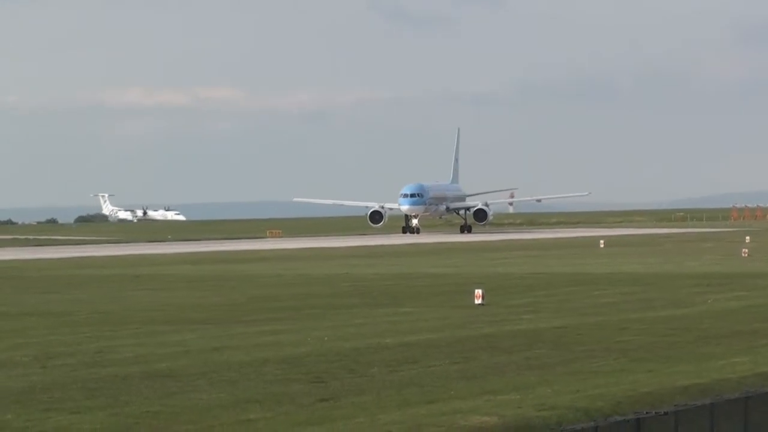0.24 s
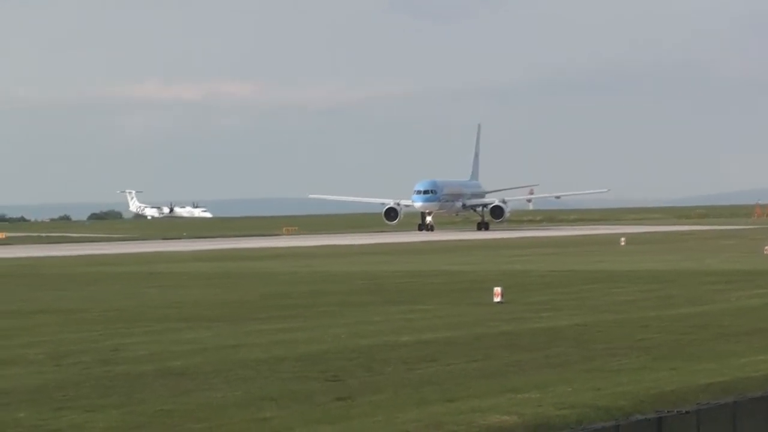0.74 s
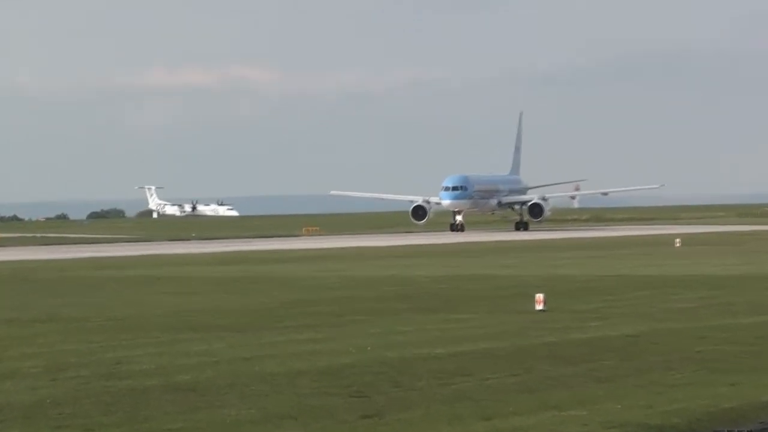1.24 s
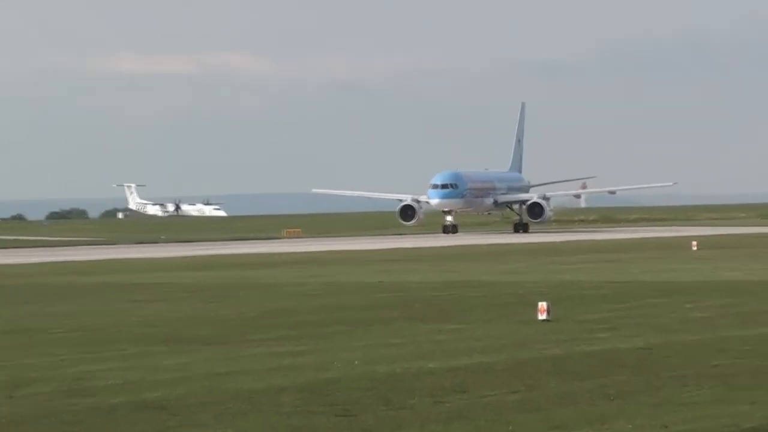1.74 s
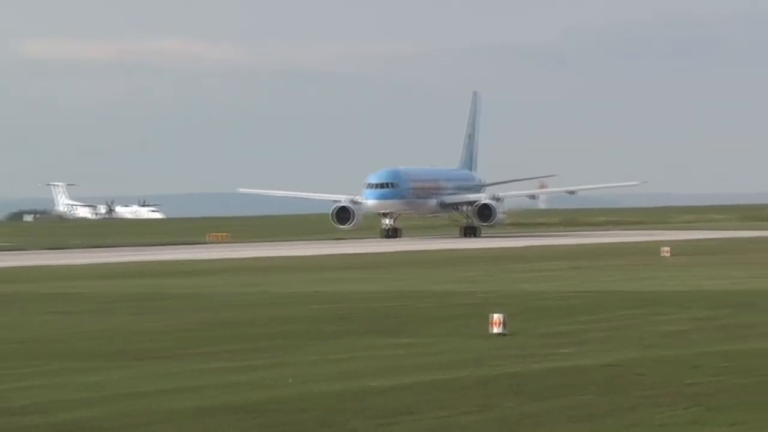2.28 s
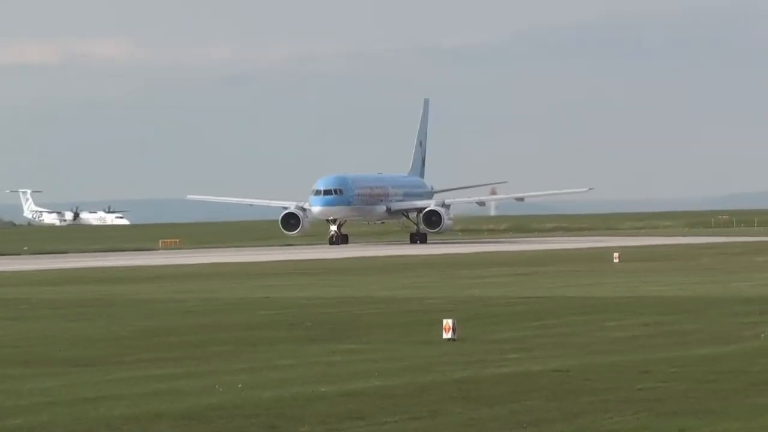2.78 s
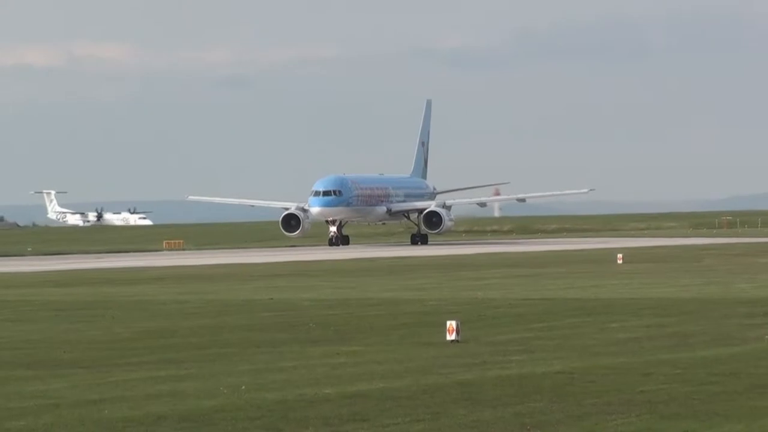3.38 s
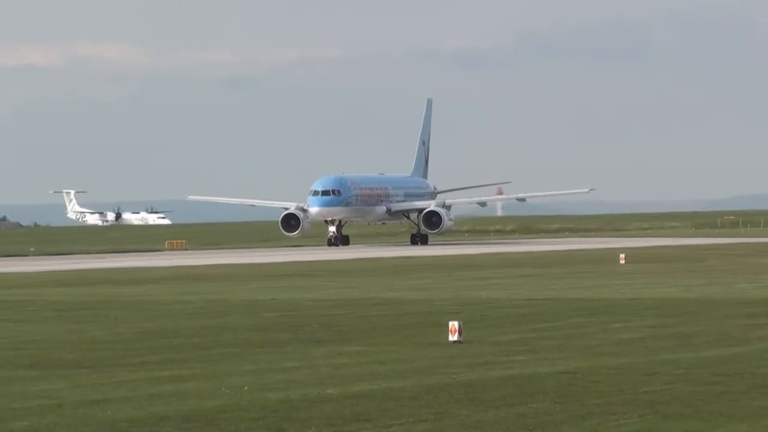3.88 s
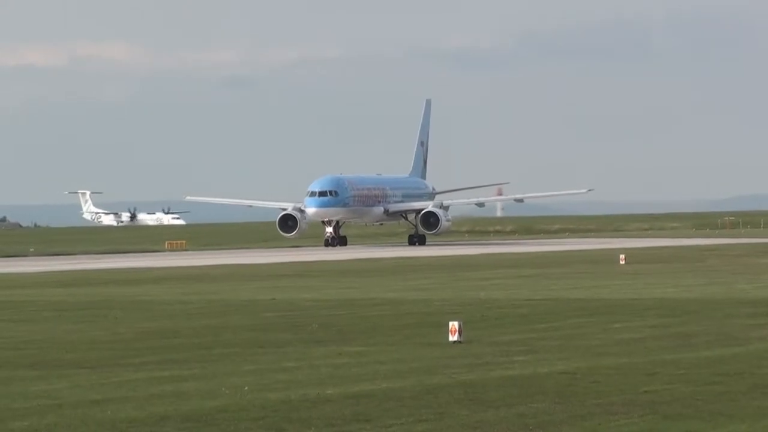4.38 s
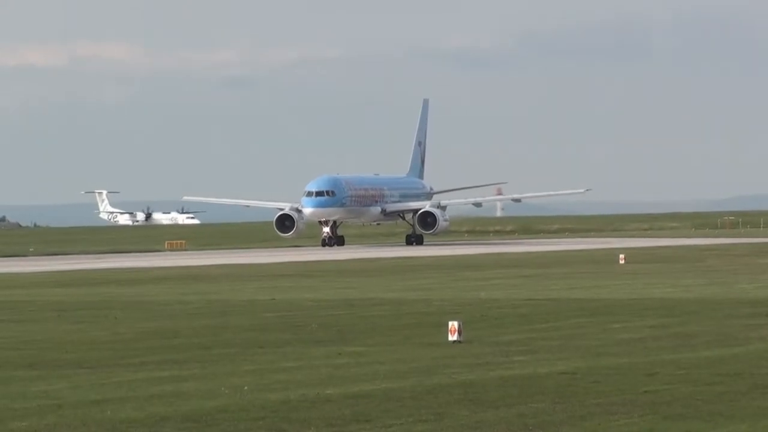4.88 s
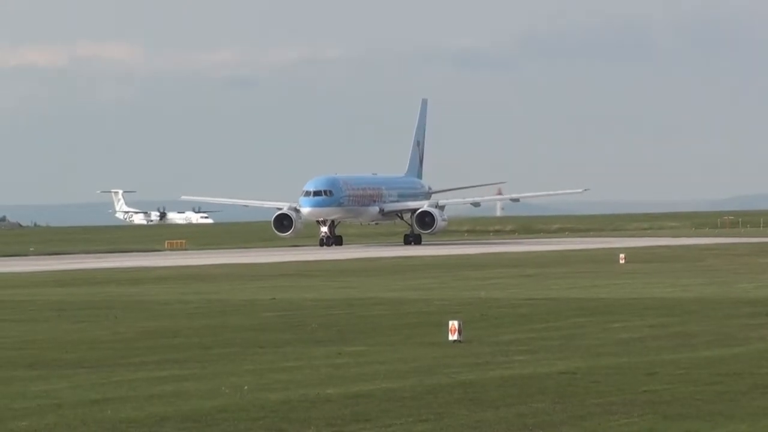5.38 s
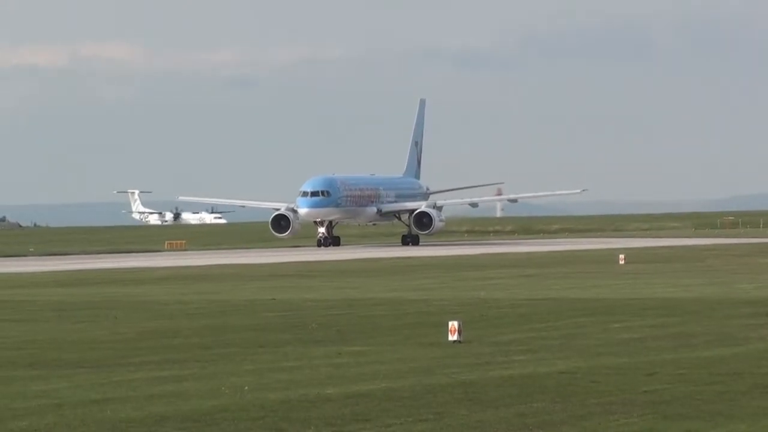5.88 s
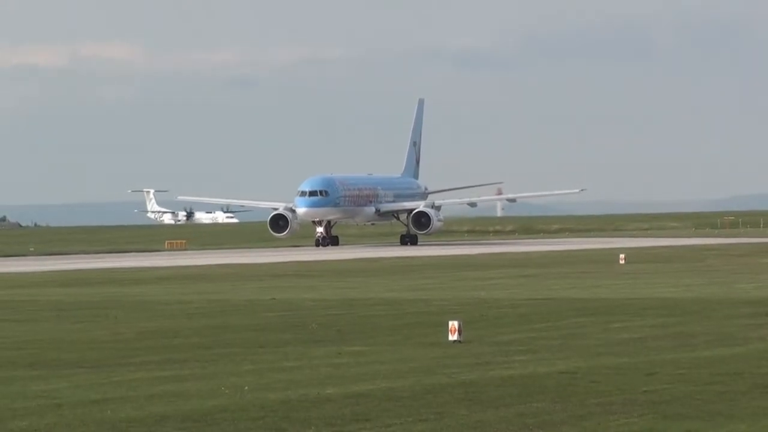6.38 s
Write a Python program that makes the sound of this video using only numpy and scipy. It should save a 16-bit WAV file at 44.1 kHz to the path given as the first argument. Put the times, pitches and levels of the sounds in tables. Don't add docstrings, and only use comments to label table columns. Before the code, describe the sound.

Low wind rumble and blustery slaps on a handheld camera microphone, with a faraway jet's steady rushing roar and shimmering high whine behind.

```python
import sys
import numpy as np
from scipy import signal
from scipy.fft import rfft, irfft, next_fast_len
from scipy.io import wavfile
from scipy.ndimage import uniform_filter1d, map_coordinates

SR = 44100
rng = np.random.default_rng(int(sys.argv[2]) if len(sys.argv) > 2 else 0)


def pcm_store(signal):
    levels = np.round(np.clip(np.atleast_2d(signal), -1, 1) * 32767)
    wavfile.write(sys.argv[1], SR, levels.astype(np.int16).T)


def boost(x):
    u = np.asarray(x, float) / 20
    return 10 ** u


N = 292868
CUT_S, CUT_DB = 4.375, 5.5


def unit(x):
    return x / np.sqrt(np.mean(x ** 2, axis=-1, keepdims=True) + 1e-20)


def along(points, hz):
    f, v = np.transpose(points)
    return np.interp(np.log(hz + 1), np.log(f + 1), v)


def curves(rows):
    s, *cols = np.transpose(rows)
    return [np.interp(np.arange(N) / SR, s, c) for c in cols]


def swells(rows):
    t = np.arange(0, N, step=64) / SR
    s, half_s, *cols = np.transpose(rows)
    bells = np.exp(-((t[:, None] - s) / half_s) ** 2)
    return [np.interp(np.arange(N) / SR, t, bells @ c) for c in cols]


def wobble(rate):
    knots = rng.standard_normal(4000)
    return map_coordinates(knots, [np.arange(N) * np.clip(rate, .1, 500) / SR])


def filtered(x, response):
    m = next_fast_len(N + SR // 2)
    return irfft(rfft(x, m) * response(np.fft.rfftfreq(m, 1 / SR)), m)[..., :N]


def coloured(x, spectrum):
    return unit(filtered(x, lambda hz: boost(along(spectrum, hz))))


def paired(x, alike):
    turn = np.arccos(np.clip(alike, -1, 1)) / 2
    shared, apart = np.cos(turn) * x[0], np.sin(turn) * x[1]
    return np.array([shared + apart, shared - apart])


def rush(spectrum, alike, patchy_db):
    z = signal.stft(rng.standard_normal((2, N)), nperseg=512)[2]
    field = uniform_filter1d(rng.standard_normal(z.shape[1:]), size=6, axis=0)
    field = uniform_filter1d(field, size=20, axis=1)
    pair = signal.istft(z * boost(patchy_db * field / field.std()), nperseg=512)[1][:, :N]
    return coloured(paired(pair, alike), spectrum)


# (time [s], level [dB])
AIR = [(0.0, -4.5), (0.11, -3), (0.27, -4.5), (0.96, -1.5), (1.13, -3.5), (1.51, 0.5), (1.83, -3.5),
       (2.16, 2), (2.62, 4.5), (2.94, 2.5), (3.29, 4.5), (3.67, -0.4), (4.3, 3), (4.54, -1.5), (5.07, -1.5),
       (5.53, -1), (6.31, 6), (6.64, 6)]


def air_clearness():
    since_cut = np.arange(N) / SR - CUT_S
    duck_db, duck_s = 2.5, 0.17
    return curves(AIR)[0] + duck_db / 2 * np.sign(-since_cut) * np.exp(-np.abs(since_cut) / duck_s)


# (time [s], half length [s], change [dB], sharpness [dB])
GUSTS = [(0.02, 0.075, 1, 3), (0.24, 0.021, -7.5, -4), (0.38, 0.046, 6, 1.5), (0.48, 0.012, -1.5, -5),
         (0.7, 0.093, 6, 5), (1.01, 0.058, 5, 4.5), (1.1, 0.006, -7.5, 2.5), (1.32, 0.05, 1.5, 0.5),
         (1.54, 0.12, 5.5, 8.5), (1.76, 0.16, -9.5, -1), (1.79, 0.03, 5.5, 2.5), (1.86, 0.01, -2.5, -5.5),
         (2.1, 0.054, -5.5, -3), (2.34, 0.066, -2, 10.5), (2.46, 0.02, -5.5, 1), (2.64, 0.14, -7.5, 4),
         (2.92, 0.07, 6.5, 6), (3.14, 0.18, -5, 1.5), (3.42, 0.06, 5.5, 4), (3.62, 0.044, -0.5, -1.5),
         (3.74, 0.042, -12.5, 3.5), (4.14, 0.016, -7.5, -0.5), (4.34, 0.061, 6.5, 2.5),
         (5.08, 0.42, -3.5, -0.7), (5.4, 0.1, -0.5, -3), (5.72, 0.16, -2.5, -0.6), (6.0, 0.1, -2.5, -1.5),
         (6.08, 0.019, 5.5, -0.5), (6.34, 0.24, 3, 1), (6.64, 0.026, -6.5, 1)]


def gusts():
    return swells(GUSTS)


# (frequency [Hz], density [dB per Hz])
EXHAUST = [(100, -120), (300, -40), (600, -6.5), (1000, -0.7), (1500, -0.9), (2000, 0.8), (2600, -3),
           (3050, -5), (3500, -38), (4500, -120)]
# (frequency [Hz], density [dB per Hz])
INTAKE = [(1800, -120), (2700, -36), (3050, -14), (3300, -1.5), (3800, -5), (4050, -2.5), (4300, -9),
          (4800, -36), (6000, -120)]
# (frequency [Hz], density [dB per Hz])
EDGE = [(2500, -120), (4000, -25), (4500, 1), (5200, -6), (6000, -12), (7000, -26), (8500, -24),
        (10000, -47), (13000, -120)]


def roar(air_db):
    turn_db = 0.85 * (np.arange(N) - N / 2) / SR
    exhaust_db = -49 + 0.97 * air_db - turn_db + 0.13 * gusts()[0]
    out = boost(exhaust_db) * rush(EXHAUST, alike=0.94, patchy_db=1.58)
    out += boost(-55 + 0.65 * air_db) * rush(INTAKE, alike=0.77, patchy_db=2.0)
    out += boost(-64.5 + 0.78 * air_db) * rush(EDGE, alike=0.92, patchy_db=3.0)
    return out


def whine(hz, level_db, wander_hz, flutter):
    phase = 2 * np.pi * np.cumsum(hz + wander_hz * wobble(30)) / SR
    apart = 0.3 * wobble(5) * np.array([[1], [-1]])
    paths = (1 + flutter * wobble(45)) / np.hypot(1, flutter)
    return np.sqrt(2) * boost(level_db) * paths * np.sin(phase + apart)


# (time [s], half length [s], change [dB])
THIRD_GLINTS = [
    [(0.62, 0.12, 4), (1.14, 0.14, 13), (2.08, 0.08, 12), (2.5, 0.41, 13), (3.15, .15, 10),
     (3.94, 0.05, 15), (4.3, 0.05, -2), (4.56, 0.08, 6), (5.24, 0.05, 13), (5.6, 0.15, 11)],
    [(2.52, 0.08, 10.8), (3.3, 0.05, 13), (3.62, 0.05, 13), (3.78, 0.17, 20), (3.9, 0.05, 11),
     (4.3, 0.05, 8), (5.18, 0.059, 13), (5.74, 0.2, 8), (6.32, 0.46, 14)],
    [(0.15, 0.08, 14), (0.29, 0.07, 17), (0.6, .05, 5), (0.84, 0.064, 7.5), (1.14, 0.072, 15.5),
     (1.6, 0.16, 2), (2.2, .15, 7), (3.1, 0.042, -1), (3.26, 0.06, 6), (3.6, 0.048, 7), (3.92, 0.05, 1),
     (5.32, 0.043, 9), (5.85, 0.1, 5), (6.24, .05, 10), (6.45, .08, 6), (6.63, .04, 13)],
]


def carried(levels_db, glints, third, air_db):
    rows_of_tones = [*glints, THIRD_GLINTS[third]]
    return [db + air_db + swells(rows)[0] + 1.1 * wobble(9) for db, rows in zip(levels_db, rows_of_tones)]


FAN_HZ = [1834.5, 3671.5, 1985]
FAN_DB = [-65.5, -77, -70.5]
# (time [s], half length [s], change [dB])
FAN_GLINTS = [
    [(0.42, 0.14, -1), (0.76, 0.037, 11), (1.3, 0.19, 10.5), (1.75, 0.15, 8), (2.24, 0.051, 14),
     (2.3, 0.056, 3.5), (2.56, 0.14, 7.5), (2.95, 0.099, 5), (2.82, 0.057, 6), (3.2, 0.3, 5),
     (3.64, 0.049, -14), (3.88, 0.047, 5.5), (3.96, 0.33, 9), (4.52, 0.057, 8), (5.38, 0.2, 10.5),
     (5.05, 0.13, 6), (5.5, 0.035, 8), (5.7, 0.099, -13), (6.56, 0.35, 5)],
    [(0.04, 0.04, 14), (0.46, 0.35, 11.5), (0.66, 0.04, 7), (1.0, 0.22, -18), (1.3, 0.054, 7),
     (1.48, 0.97, 23.5), (1.68, 0.065, -23), (2.16, 0.081, -1), (2.4, 0.046, 5.5), (2.86, 0.51, 21.5),
     (3.2, 0.1, 8.5), (3.82, 0.49, 15.5), (5.58, 0.18, -1), (6.16, 0.28, 15)],
]
# (frequency [Hz], density [dB per Hz])
HALO = [(3000, -78), (3500, -9), (3750, 4.5), (4000, -7.5), (4500, -80)]


def fan(air_db):
    fan_db = carried(FAN_DB, FAN_GLINTS, 0, air_db)
    tones = sum(whine(hz, db + .5, wander_hz=5, flutter=.15) for hz, db in zip(FAN_HZ, fan_db))
    return tones + boost(fan_db[1] - 6.0) * rush(HALO, alike=.9, patchy_db=5.0)


# (time [s], frequency [Hz])
SPOOL = [
    (0, 4535),
    (1.5, 4529),
    (3, 4521),
    (6.64, 4515),
]


def shaft_speed():
    return curves(SPOOL)[0] / CORE_HZ[1]


CORE_HZ = [4180, 4520, 5279]
CORE_DB = [-64.5, -70, -86.5]
# (time [s], half length [s], change [dB])
CORE_GLINTS = [
    [(0.18, 0.22, -11), (.6, 0.064, 7), (1.3, 0.11, -14), (1.74, 0.04, 10), (2.08, 0.046, -12),
     (2.22, 0.19, 12.5), (3.12, 0.64, 8.5), (4.02, 0.04, 4.5), (4.32, 0.7, 8), (4.36, 0.087, -6),
     (5.08, 0.065, 11.5), (5.54, 0.045, -9), (5.7, 0.25, 10.5), (5.72, 0.04, 6), (6.22, 0.1, 9),
     (6.54, 0.22, 6)],
    [(1.98, 0.083, 11), (2.48, 0.04, 6), (3.46, 0.24, 11), (3.62, 0.13, -13), (3.86, 0.035, 8),
     (4.42, 0.072, 5), (4.7, 0.04, 6.8), (4.8, 0.41, 8), (5.12, 0.073, 6), (5.36, 0.032, 10),
     (5.54, 0.028, 8), (5.82, 0.05, 4), (6.26, 0.07, -23), (6.34, 0.71, 16)],
]


def compressor(air_db):
    low_hz, high_hz, top_hz = [hz * shaft_speed() for hz in CORE_HZ]
    second_hz = (CORE_HZ[0] + 21) * shaft_speed()
    low_db, high_db, top_db = carried(CORE_DB, CORE_GLINTS, 1, air_db)
    tones = whine(low_hz, low_db - 2.5, wander_hz=7, flutter=.3)
    tones += whine(second_hz, low_db - 4.5, wander_hz=9, flutter=.4)
    tones += whine(high_hz, high_db + .4, wander_hz=4, flutter=.2)
    tones += whine(top_hz, top_db - 1, wander_hz=7, flutter=0.4)
    return tones


STAGE_HZ = [3838, 3890, 3968]
STAGE_DB = [-74, -74, -70]
# (time [s], half length [s], change [dB])
STAGE_GLINTS = [
    [(1.5, 0.35, 7.0), (2.34, 0.5, 9.3), (3.88, 0.5, 12.7), (4.56, 0.09, 11.8), (5.66, 0.5, 11.8),
     (6.6, 0.35, 7.3)],
    [(1.7, 0.5, 11.0), (2.72, 0.5, 11.9), (3.14, 0.09, 9.0), (4.24, 0.5, 6.2), (5.16, 0.14, 7.2),
     (5.76, 0.5, 9.5)],
]


def middle_stages(air_db):
    speed, stage_db = shaft_speed(), carried(STAGE_DB, STAGE_GLINTS, 2, air_db)
    return sum(whine(hz * speed, db, wander_hz=8, flutter=0.5) for hz, db in zip(STAGE_HZ, stage_db))


MINOR_HZ = [2071, 2094, 2266, 3603, 3709, 4150, 4342, 5453, 5690, 6010]
MINOR = [-69, -66, -70, -72, -66, -72, -70, -85, -91, -89]


def minor_tones(air_db):
    swell_db = air_db - air_db.mean()
    levels_db = [db + swell_db + 3 * wobble(2.5) for db in MINOR]
    return sum(whine(hz, db, wander_hz=4, flutter=.6) for hz, db in zip(MINOR_HZ, levels_db))


# (frequency [Hz], density [dB per Hz])
DRONE = [(700, -80.5), (980, -3), (1100, 1), (1220, -11.5), (1600, -82)]
# (time [s], half length [s], change [dB])
DRONE_SWELLS = [
    (2.25, 0.087, 10),
    (3.3, .06, 10),
    (3.73, 0.071, 12.4),
    (3.9, 0.074, 9.9),
    (4.05, 0.12, 13),
    (4.2, 0.086, 15),
]


def drone():
    return boost(-64.5 + swells(DRONE_SWELLS)[0]) * rush(DRONE, alike=.8, patchy_db=2.8)


# (time from start [s], frequency [Hz], level [dB])
SWEEP = [
    (0, 3730, -68.5),
    (0.129, 3700, -51.5),
    (.28, 3370, -48),
    (.4, 3335, -48.5),
    (.53, 3120, -85),
]
# (start [s], length share [1], glide share [1], lift [dB])
SWEEPS = [
    (2.04, 0.5, 0.8, -0.5),
    (3.019, 1.01, 1.01, -2.5),
    (6.082, 0.82, 0.8, -4),
]


def sweep():
    band = unit(filtered(rng.standard_normal((2, N)), lambda f: 1 / (1 + (f / 260) ** 4)))
    out, t = np.zeros(N), np.arange(N) / SR
    start_hz = SWEEP[0][1]
    for s, share, glide, lift_db in SWEEPS:
        rows = [(s + share * after, start_hz * (1 - glide) + hz * glide, db) for after, hz, db in SWEEP]
        hz, db = curves(rows)
        phase = 2 * np.pi * np.cumsum(hz) / SR
        heard = (t > rows[0][0]) & (t < rows[-1][0])
        out += heard * boost(db + lift_db) * (band[0] * np.cos(phase) + band[1] * np.sin(phase))
    return out


def engines():
    air_db = air_clearness()
    tones = fan(air_db) + compressor(air_db) + middle_stages(air_db) + minor_tones(air_db)
    return roar(air_db) + tones + drone() + sweep()


# (frequency [Hz], density [dB per Hz])
BUFFET = [(5, -95.5), (15, -36.5), (25, -15.5), (50, -10), (95, -4), (150, -4.5), (230, -13), (400, -38.5),
          (700, -62), (1200, -120)]
# (time [s], half length [s], change [dB])
HEAVES = [(0.11, 0.061, -2), (0.419, 0.025, 2.5), (0.504, 0.014, -8), (0.599, 0.025, 6.5),
          (0.733, 0.064, -1), (1.043, 0.086, -3), (1.207, 0.031, 0), (1.497, 0.022, -1),
          (1.601, 0.022, -2.5), (1.651, 0.017, 7), (1.866, 0.02, 0.5), (1.951, 0.023, 6),
          (2.04, 0.025, -6.5), (2.185, 0.025, -6.5), (2.355, 0.04, 4.0), (2.484, 0.025, -4),
          (2.679, 0.036, -6.5), (3.128, 0.027, 5.5), (3.168, 0.023, -3), (3.377, 0.07, 2.5),
          (3.602, 0.025, -3), (3.831, 0.017, -3), (3.971, 0.0091, 5.5), (4.076, 0.025, 7.5),
          (4.146, 0.04, -3.5), (4.146, 0.061, 2), (4.235, 0.025, 3.5), (4.46, 0.018, 2), (4.535, 0.033, -3),
          (4.605, 0.016, 4), (4.814, 0.029, -5.5), (4.889, 0.025, 4), (4.949, 0.033, -6.5),
          (5.029, 0.023, 3), (5.098, 0.018, -2.5), (5.273, 0.017, 4.5), (5.363, 0.025, 0.5),
          (5.473, 0.022, -2.5), (5.637, 0.027, -1.5), (5.837, 0.019, 5.5), (6.106, 0.025, -4.0),
          (6.171, 0.12, 0.5), (6.43, 0.025, -2.5), (6.565, 0.07, 1)]


def buffet(gust_db, sharp_db, lumps_db):
    level_db = -24.5 + 1.1 * gust_db - sharp_db / 2 + lumps_db + swells(HEAVES)[0]
    return boost(level_db) * rush(BUFFET, alike=0.78, patchy_db=0.6)


def eddies(rate, spread_db, push, smooth):
    draw = rng.random((3, N))
    size = -np.log(draw[1] + .06)
    strikes = (draw[0] < rate / SR) * boost(spread_db * size) * np.where(draw[2] < push, 1, -1)
    return unit(strikes) + smooth * rng.standard_normal(N)


# (frequency [Hz], density [dB per Hz])
EDDY = [(20, -100), (60, -54.5), (130, -10.5), (220, -3.5), (330, -5.5), (520, -12), (800, -20),
        (1300, -26), (2500, -39), (5000, -76), (9000, -120)]


def quick_eddies(gust_db, sharp_db, lumps_db):
    left = eddies(rate=260, spread_db=3, push=.8, smooth=1.1)
    right = eddies(rate=300, spread_db=5.2, push=0.6, smooth=1.1)
    pair = np.array([left, right + 0.54 * np.roll(left, 6)])
    level_db = -33 + 0.71 * gust_db + sharp_db / 2 + lumps_db + 1.57 * wobble(45)
    return boost(level_db) * coloured(pair, EDDY)


def struck(events, spectrum, ragged_s=0):
    blows, t = np.zeros((2, N + 256)), np.arange(256) / SR
    for (s, left_db, right_db), tear in zip(events, rng.standard_normal((len(events), 256))):
        shape = tear * np.exp(-t / ragged_s) if ragged_s else 1. * (t == 0)
        shape = shape / np.linalg.norm(shape)
        blows[:, round(s * SR):][:, :256] += np.outer(boost([left_db, right_db]), shape)
    colour = lambda hz: boost(along(spectrum, hz))
    return filtered(blows[:, :N], colour) / colour(np.linspace(0, SR / 2, num=4096)).mean()


# (time [s], peak [dB])
SLAPS = [(0.0187, -18.5), (0.1791, -16.5), (0.2988, -4), (0.329, -12), (0.379, -11), (0.3968, -15),
         (0.4026, -4), (0.5469, -9.5), (0.6844, -6), (0.6986, -13), (0.7567, -9), (0.7752, -9),
         (0.8367, -6), (0.8464, -9.5), (1.0109, -9.5), (1.032, -11.5), (1.0671, -11.5), (1.1457, -9.5),
         (1.1604, -8), (1.1993, -4.5), (1.2398, -8.5), (1.3143, -2.5), (1.3297, -5.5), (1.4583, -6.5),
         (1.5146, -2.5), (1.5407, -21.5), (1.563, -13), (1.576, -6.5), (1.9229, -8), (2.2413, -9),
         (2.9147, -19), (2.9372, -21), (3.3282, -11.5), (3.3695, -5), (3.4006, -11), (3.4195, -8),
         (3.4458, -16.5), (3.4635, -6), (3.6795, -16), (3.8585, -6), (3.9721, -7.5), (4.0372, -8.5),
         (4.292, -8.5), (4.3383, -9.5), (4.3442, -4.5), (4.3868, -4.5), (4.3968, -14.5), (4.6681, -9.5),
         (4.7045, -14.5), (4.7662, -10.5), (4.8893, -12.5), (5.2857, -8), (5.8367, -9.5), (5.8463, -10.5),
         (6.0635, -15), (6.0727, -10.0), (6.192, -9), (6.2751, -3.5), (6.2957, -8.5), (6.3543, -8.5)]
# (time [s], peak [dB])
PATS = [(0.078, -21.5), (0.1197, -11.5), (0.1324, -17), (0.1881, -14), (0.2046, -9), (0.3535, -13),
        (0.3629, -15), (0.3712, -18.5), (0.3865, -7.5), (0.5191, -6), (0.5576, -11), (0.5704, -9),
        (0.6014, -12.5), (0.7142, -15), (0.7906, -15), (0.9376, -4.5), (0.9478, -13), (0.9524, -14.5),
        (1.0255, -17), (1.1803, -23.5), (1.3061, -19), (1.4374, -15), (1.473, -15.5), (1.4812, -19),
        (1.5187, -11), (1.5458, -11), (1.5675, -20.5), (1.8067, -11.5), (1.897, -11.5), (1.9524, -18.5),
        (1.9629, -16), (1.9767, -13.0), (2.5245, -12), (2.8819, -14.0), (2.9684, -9.5), (2.9749, -14.5),
        (2.9788, -8), (3.3908, -18), (3.4079, -11), (3.4897, -17), (3.5513, -15), (3.8781, -14.5),
        (4.0732, -11), (4.322, -11), (4.373, -20), (4.3795, -22), (4.4689, -20), (4.5193, -9),
        (4.7447, -12.5), (5.827, -11), (5.9066, -9.5), (6.0864, -21.5), (6.1403, -14), (6.3653, -10.5),
        (6.4712, -11), (6.4854, -17), (6.4934, -9.5), (6.546, -9), (6.5632, -19.5), (6.5745, -18.5)]
# (time [s], peak [dB])
SUCKS = [(0.0171, -7), (0.3682, -13), (0.3776, -16.5), (0.3985, -14.5), (0.753, -6.5), (1.0234, -9.5),
         (1.0303, -17), (1.4424, -6), (1.542, -18), (1.568, -6), (1.5776, -9), (2.8673, -11),
         (4.0339, -12.5), (4.3202, -10.0), (4.3405, -14), (4.3911, -9), (5.5858, -9.5), (6.062, -7),
         (6.3422, -18), (6.3555, -8.5)]
# (frequency [Hz], density [dB per Hz])
SLAP = [(30, -30.5), (90, 0), (200, 0), (400, -6), (700, -16), (1200, -34), (2200, -52.5), (6000, -120)]


def slaps():
    both = lambda rows: struck([(s, db - 3.5, db - 10) for s, db in rows], SLAP)
    blows = both(SLAPS + PATS) - both(SUCKS)
    return filtered(blows, lambda hz: np.exp(-.5j * port_lead(hz)))


# (time [s], peak [dB], left-right [dB])
SNAPS = [(0.0211, -38, 12), (0.0498, -33, 11), (0.1739, -31, 13), (0.2049, -47, 5.0), (0.2858, -45, 3.0),
         (0.2982, -32, 7), (0.3952, -30, 7), (0.5731, -36, 7), (0.6011, -36, 4.0), (0.698, -34.5, 4),
         (0.8193, -35, 8), (0.8374, -35.5, 8), (0.9314, -32.5, 12), (1.0262, -35, -3),
         (1.1598, -37.5, -1.0), (1.1969, -38, 6), (1.2278, -39, -1.0), (1.2394, -33.5, 1), (1.2517, -31, 2),
         (1.314, -28, 8), (1.5112, -34, 5), (1.8226, -46, -3), (2.3887, -35.0, 2), (2.9806, -28, 7),
         (3.3286, -34, -9), (3.4633, -40, 3), (4.2121, -36, -3), (4.292, -27.5, 2.0), (4.5064, -36, 2),
         (4.7068, -39, -3), (4.7659, -39, 11), (5.1362, -32, -0.5), (5.2148, -39.0, -6), (5.8272, -38, 0.5),
         (6.1439, -38, -1.0), (6.2968, -39, 14), (6.3631, -34.0, 8), (6.6283, -37.0, -7.0),
         (6.6376, -39.5, 0.0)]
# (frequency [Hz], density [dB per Hz])
SNAP = [(400, -87.5), (900, -11.5), (1600, -10), (3000, -14.5), (4200, -43.5), (6000, -120)]


def snaps():
    events = [(s, db + pan_db / 2 + 5, db - pan_db / 2 + 2) for s, db, pan_db in SNAPS]
    return struck(events, SNAP, ragged_s=.0025)


def wind():
    gust_db, sharp_db = gusts()
    lumps_db = 0.92 * wobble(25)
    steady = buffet(gust_db, sharp_db, lumps_db) + quick_eddies(gust_db, sharp_db, lumps_db)
    return steady + slaps() + snaps()


# (frequency [Hz], lead [radians])
LEAD = [(30, 0.21), (80, -0.41), (150, -1.16), (300, -.3), (450, -0.039), (2500, 0.66), (3500, .27),
        (5000, 0.57)]


def port_lead(hz):
    return along(LEAD, hz)


# (frequency [Hz], left-right [dB])
LEAN = [(30, -4), (60, -6.5), (110, -3.3), (210, 5), (400, 4.5), (1400, -2), (2640, -5), (4960, -6.5)]


def through_ports(x):
    sides = np.array([[.5], [-.5]])
    return filtered(x, lambda hz: boost(along(LEAN, hz) * sides) * np.exp(1j * port_lead(hz) * sides))


def gain_control():
    t = np.arange(N) / SR
    creep_db = 2.5 * np.clip(t - 1.7, 0, None)
    return -83.5 + creep_db - CUT_DB * (t > CUT_S)


# (frequency [Hz], density [dB per Hz])
NOISE = [(1500, -120), (4000, -21), (6500, 0), (8000, -5.5), (10000, -4.5), (10500, -4.5), (13500, -7.5),
         (14600, -6), (15000, -14.5), (16000, -21)]


def hiss():
    noise = rush(NOISE, alike=-.35, patchy_db=.7)
    return boost(gain_control() + 10.5) * noise * boost([[-.8], [.8]])


# (time [s], peak [dB], top [Hz], left-right [dB])
TICKS = [(0.0438, -59, 7500, -6), (0.2957, -58, 7600, -5), (0.3252, -64, 6800, -11),
         (0.3975, -58, 8800, -5.5), (0.6947, -57, 8900, -2), (0.8315, -61, 7000, -6),
         (1.0167, -54, 8500, -8), (1.4666, -66, 7000, -9), (1.5499, -58, 8200, -5), (1.5612, -59, 9040, -3),
         (3.9664, -60, 7500, -3.5), (4.9694, -68, 13500, -7), (5.632, -56.5, 13500, -2)]


def ticks():
    out, t = np.zeros((2, N)), np.arange(SR // 50) / SR
    for s, db, top_hz, pan_db in TICKS:
        tick = boost(db + 9 - 60 * t / .011) * rng.standard_normal(len(t))
        band = lambda f: 1 / (1 + (5500 / (f + 1)) ** 8) / (1 + (f / top_hz) ** 16)
        tick = filtered(tick, band)[:len(t)]
        start = round(s * SR)
        out[:, start:start + len(t)] += tick * boost([[pan_db / 2], [-pan_db / 2]])
    return out


def scene():
    return through_ports(engines() + wind()) + hiss() + ticks()


def roll_off(x):
    return signal.sosfilt(signal.butter(12, 15720, fs=SR, output="sos"), x)


def record(dry):
    mix = dry / (1 + np.abs(dry / .53) ** 8) ** (1 / 8)
    return roll_off(mix)


dry = scene()
out = record(dry)
pcm_store(out)
```